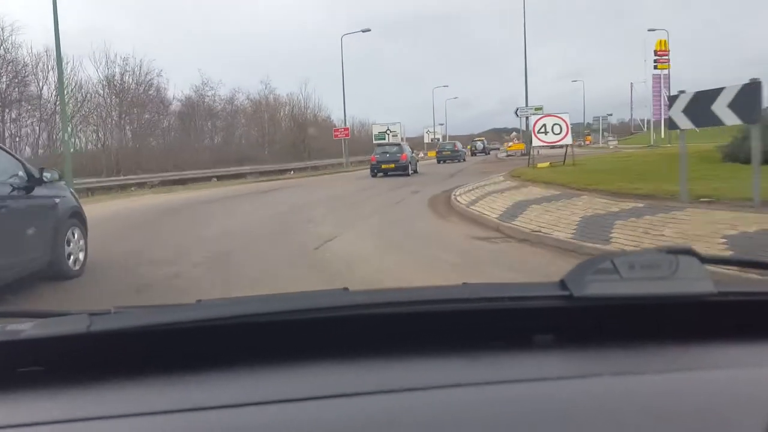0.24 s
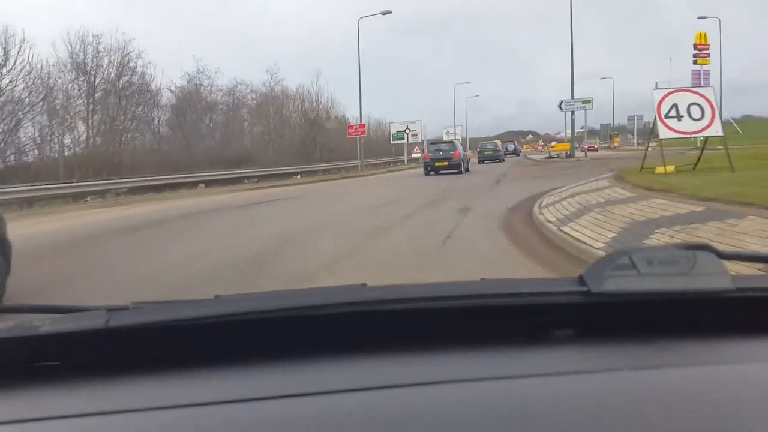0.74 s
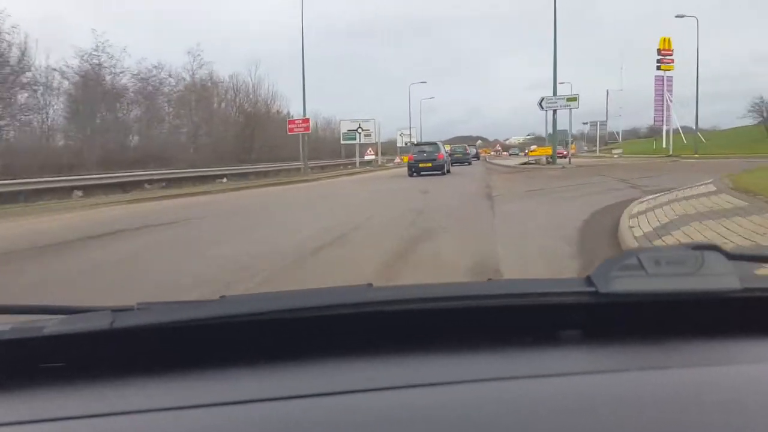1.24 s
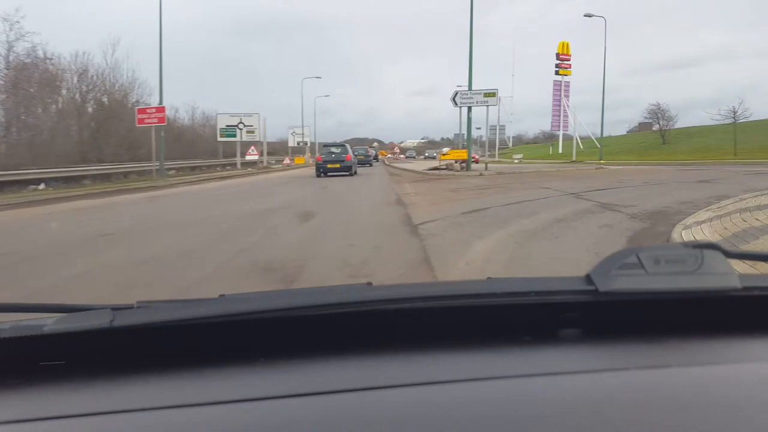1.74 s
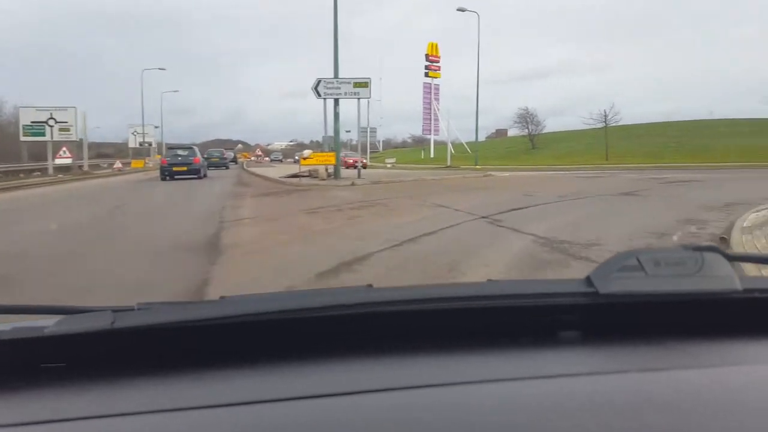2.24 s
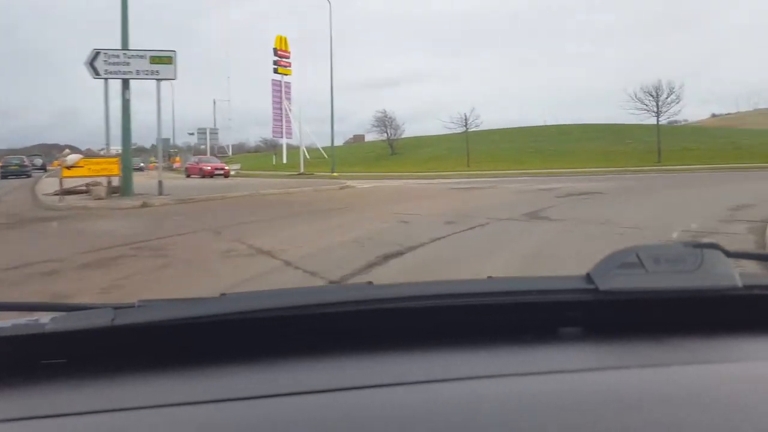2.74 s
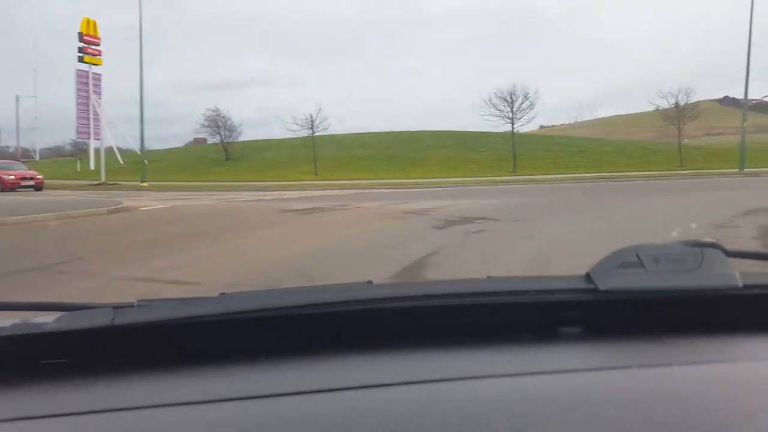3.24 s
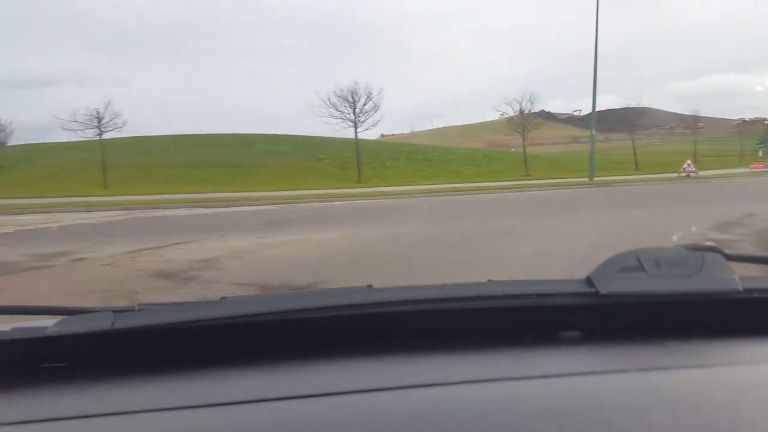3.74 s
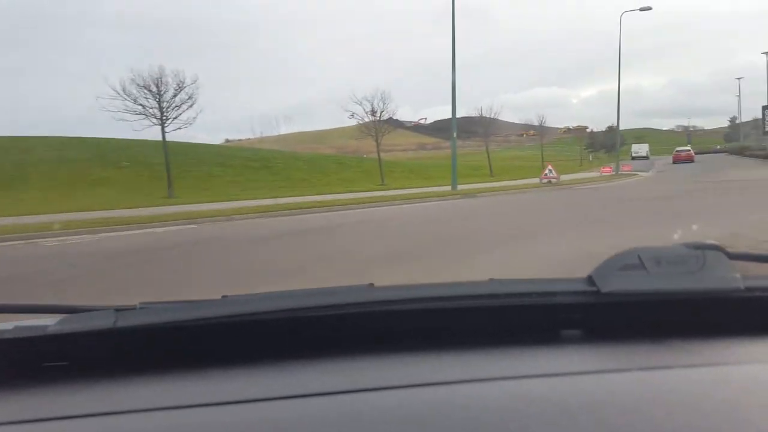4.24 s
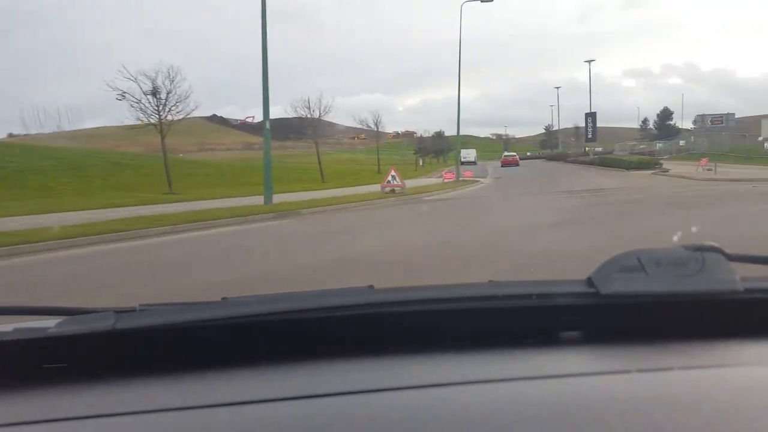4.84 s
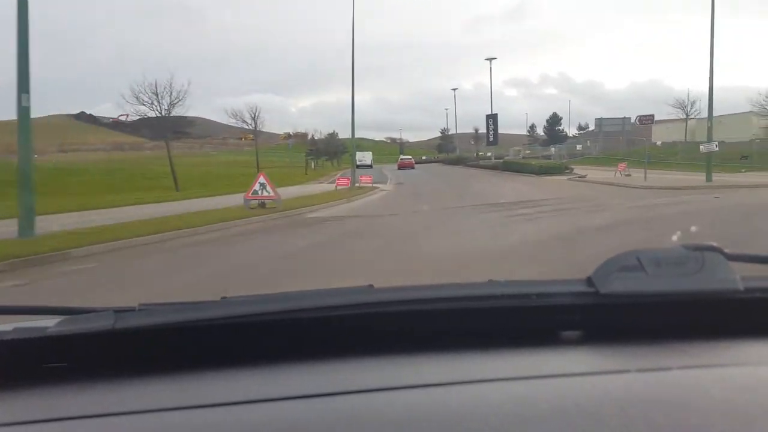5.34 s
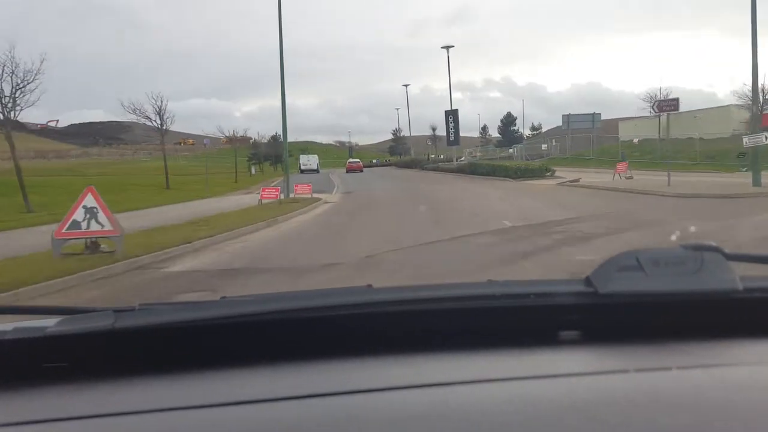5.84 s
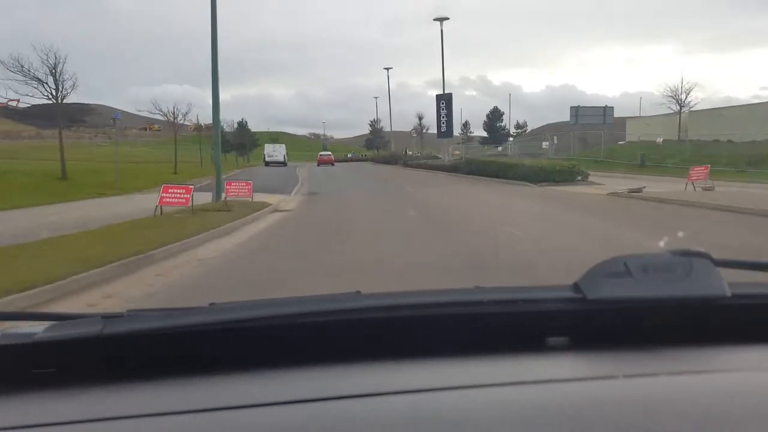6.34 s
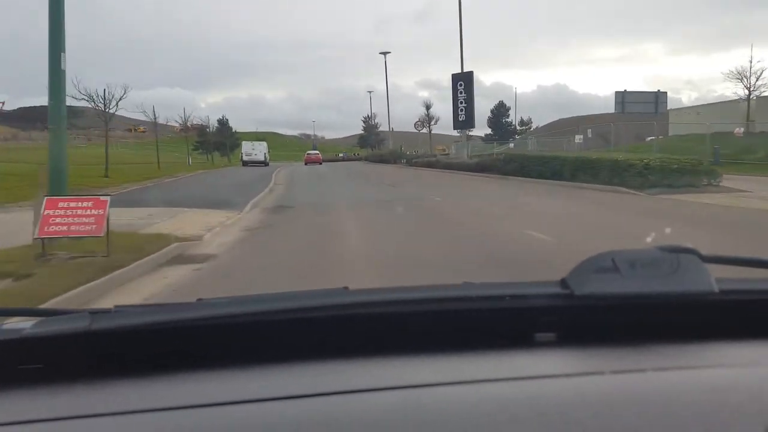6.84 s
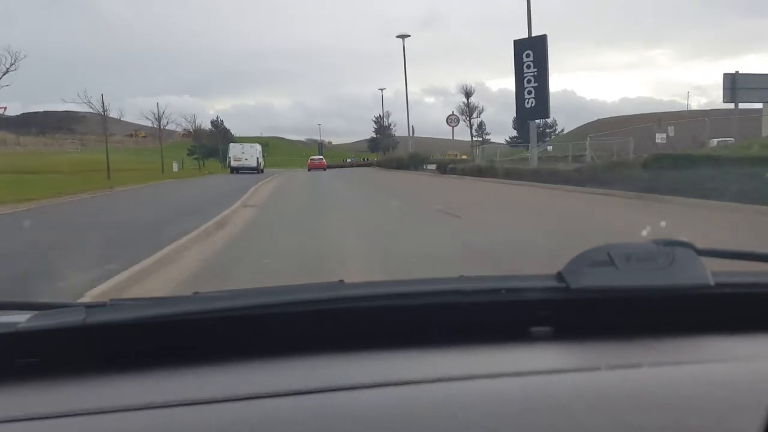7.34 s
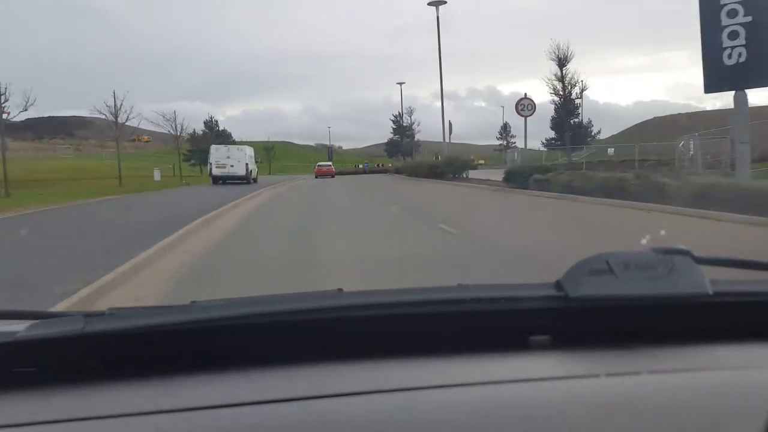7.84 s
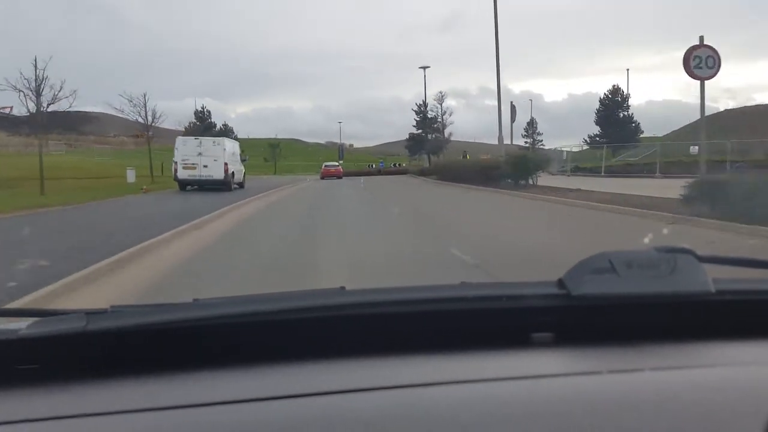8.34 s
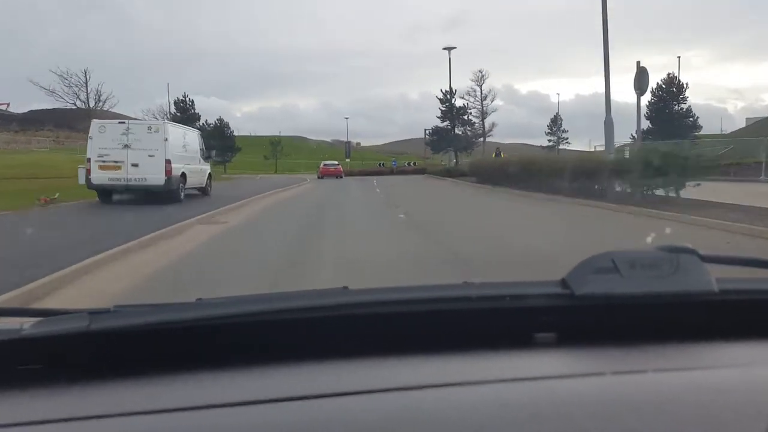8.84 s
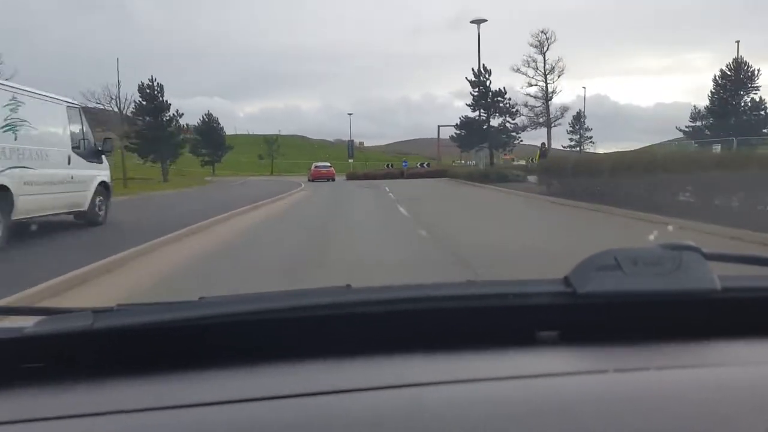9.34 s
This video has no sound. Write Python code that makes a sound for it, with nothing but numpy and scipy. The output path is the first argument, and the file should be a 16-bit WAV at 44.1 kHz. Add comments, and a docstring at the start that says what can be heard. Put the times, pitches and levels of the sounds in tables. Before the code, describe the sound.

Stereo sound inside a car cabin, about 9.6 seconds. A loud four-cylinder exhaust starts mid-pull, booming and raspy, rising until about 0.8 s. The throttle shuts; from 1.15 to 2.1 s the pipe gives a dozen uneven dull thuds with sharp cracks, over lumpy burbling and falling pitch. From 2.4 s a low drone wavers, then climbs steadily from about 4 s, growing louder and rougher. An indicator relay ticks softly on and off from 0.2 s to about 5.5 s. Loose trim buzzes from 5.5 to 7 s as the note turns hard and thin near 6.7 s, peaking in pitch around 7.4 s. The revs drop, with a brief burble, then faster pops and burbling from 8.1 to 9 s. At 9.1 s the boom returns abruptly, its pitch still sinking. Low tyre rumble, engine-bay rush, fizz and occasional small plastic clacks continue underneath.

```python
"""A four-cylinder car with a loud exhaust, heard from the cabin over about nine and a half seconds.
It pulls hard with a rasp, then the throttle shuts and the pipe pops and burbles for over a second.
It drones, climbs through the revs, pops and burbles again as they fall, and pulls once more at the end.
The note is a stack of tones tied to the firing rate; pops are struck resonances, burble is uneven firings.
The indicator ticks until about 5.5 s; trim fizzes and clacks over a low rumble and the engine-bay rush."""
import sys
import numpy as np
from scipy import signal
from scipy.fft import rfft, irfft, next_fast_len
from scipy.io import wavfile
from scipy.ndimage import uniform_filter1d, minimum_filter1d

SR = 44100
rng = np.random.default_rng(int(sys.argv[2]) if len(sys.argv) > 2 else 0)


def waveform_to_disk(signal):
    """Save audio, clipped to [-1, 1], as 16-bit WAV at the path in sys.argv[1]."""
    frames = np.transpose(np.atleast_2d(signal))
    scaled = np.clip(frames, -1, 1) * 32767
    samples = np.round(scaled).astype(np.int16)
    wavfile.write(sys.argv[1], SR, samples)


N = 422919
TIME = np.arange(N) / SR

# Stray combustion on a closed throttle, one list per stretch. Each row: time in seconds, relative level in dB.
CLOSED_THROTTLE = [
    [(.84, -41), (.89, -18), (1.06, -23.5), (1.15, -17.5), (1.55, -18), (1.9, -15.5), (2.05, -25.5),
     (2.16, -21.5), (2.28, -40.5)],
    [(7.48, -50.5), (7.55, -23), (7.62, -42.5)],
    [(8.1, -36), (8.15, -32), (8.3, -34.5), (8.55, -19), (8.8, -16), (8.98, -21.5), (9.07, -37)],
]
# Afterfire pops. Each row: time in seconds, relative level of the thud in dB, of the sharp crack in dB.
AFTERFIRE_POPS = [(1.167, -10.5, -27.5), (1.268, -3, -13), (1.313, -6.5, -14.5), (1.431, 1, -5.5),
                  (1.517, 5.5, 1), (1.567, -0.5, -5), (1.687, -0.5, -3.5), (1.814, 0.5, -1),
                  (1.93, -2.5, -5), (2.081, -2.5, -4), (8.127, -4.5, -6), (8.175, -3, -8),
                  (8.227, -14, -18.5), (8.357, 0.5, 1), (8.381, -1.5, -3), (8.428, -7.5, -16),
                  (8.534, 0.5, -6), (8.584, -7.5, -15), (8.668, -4, -15.5), (8.78, 0.5, -10),
                  (8.811, -8, -18), (8.842, -5.5, -17), (8.958, -6, -14.5)]
# Sharp clacks of plastic trim. Each row: time in seconds, relative level of the clack in dB,
# of the fizz after it in dB.
TRIM_CLACKS = [(.066, -39.5, -55), (.884, -31, -31.5), (1.143, -44, -60), (1.278, -54, -37),
               (3.19, -47, -43.5), (3.886, -56, -62), (7.554, -56, -39), (7.702, -39, -38),
               (8.574, -51, -37), (8.672, -54, -36)]
# Rush from the engine bay. Each row: time in seconds, relative level in dB.
BAY_LEVEL = [(0.0, -52.5), (0.29, -51.5), (1.52, -47.5), (3.2, -51), (3.44, -55), (4.22, -57), (5.13, -50),
             (5.61, -51.5), (6.84, -43), (7.48, -50.5), (8.04, -51), (8.44, -46), (9.11, -54),
             (9.59, -51.5)]


def from_db(db):
    """Turn decibels into a gain."""
    return 10 ** (np.asarray(db) / 20)


def rms_one(x):
    """Scale to unit power."""
    return x / np.sqrt(np.mean(x ** 2) + 1e-20)


def in_time(rows):
    """Draw each column of a timed table as a curve, sample by sample."""
    seconds, *columns = np.transpose(rows)
    return [np.interp(TIME, seconds, column) for column in columns]


def at_hz(table, hz, axis=1):
    """Read one column of a table at any pitch, on a log-frequency axis."""
    table = np.array(table)
    return np.interp(np.log(hz), np.log(table[:, 0]), table[:, axis])


def drift(rate):
    """Random wander of spread 1, with a new random target rate times a second."""
    knots = rng.standard_normal(8192)
    return rms_one(np.interp(TIME * rate, np.arange(len(knots)), knots))


def bout(start, end, attack_s, release_s):
    """Rise to 1 by the start, hold to the end, fall back to 0."""
    return np.interp(TIME, [start - attack_s, start, end, end + release_s], [0, 1, 1, 0])


def band(x, low_hz, high_hz, order=3):
    """Keep what lies between two frequencies."""
    sections = signal.butter(order, [low_hz, high_hz], "band", fs=SR, output="sos")
    return signal.sosfilt(sections, x + 1e-18)  # the tiny offset keeps the filter from slowing in silence


def resonate(x, modes):
    """Ring several resonances side by side, with alternating sign."""
    out = 0
    for k, (hz, width, db) in enumerate(modes):
        r = np.exp(-np.pi * width / SR)  # a wider resonance dies away sooner
        zeros = [(1 - r * r) / 2, 0, (r * r - 1) / 2]
        poles = [1, -2 * r * np.cos(2 * np.pi * hz / SR), r * r]
        out = out + (-1) ** k * from_db(db) * signal.lfilter(zeros, poles, x + 1e-18)
    return out


def strikes(events):
    """Place a one-sample click for each row of time in seconds and level in dB."""
    seconds, db = np.transpose(events)
    clicks = np.zeros(N)
    clicks[(seconds * SR).astype(int)] = from_db(db)
    return clicks


def fade(clicks, t60):
    """Let each click jump up and die away by 60 dB in t60 seconds."""
    return signal.lfilter([1], [1, -np.exp(-np.log(1000) / (t60 * SR))], clicks + 1e-18)


def clicks_on(events, modes, level_db, t60):
    """Click a small part: fading noise, different in each ear, rings its resonances."""
    scatter = fade(strikes(events), t60) * rng.standard_normal((2, N))
    unit = np.std(resonate(rng.standard_normal(SR), modes))  # how loud plain noise comes out
    return from_db(level_db) * resonate(scatter, modes) / unit


def noise(spectrum, low_hz, high_hz, lag_s=0.00041):
    """Coloured stereo noise, of unit power between two frequencies; it reaches the left ear first."""
    # Width of the noise. Each row: frequency in Hz, side minus middle in dB.
    stereo_width = [(40, -11), (120, -14.5), (400, -8), (700, -8), (1150, -4), (2300, -4.5), (4400, 0.5),
                    (15000, -2)]
    size = next_fast_len(N, real=True)
    hz = np.maximum(np.arange(size // 2 + 1) * SR / size, 1)
    mid, side = rfft(rng.standard_normal((2, size))) * from_db(at_hz(spectrum, hz))
    side = side * from_db(at_hz(stereo_width, hz))
    delay = np.exp(-2j * np.pi * hz * lag_s)
    pair = np.array([mid + side, (mid - side) * delay])
    inside = (hz > low_hz) * (hz < high_hz)
    power = np.mean(abs(pair.mean(axis=0)) ** 2 * inside) / size
    return irfft(pair, size)[:, :N] / np.sqrt(power)


def cabin(hz):
    """Standing waves make each pitch differ in level and phase (complex gains) at left and right."""
    # Each row: frequency in Hz, left minus right in dB, lead of the left in radians.
    standing_waves = [(60, 1.6, 0), (117, 3, .3), (135, 2.4, .1), (155, 0, 0), (180, 0, -.25),
                      (200, 2.5, -1), (212, 1, -1.2), (225, 9, -.4), (270, 7.5, -.7), (305, 1.5, -.15),
                      (355, 0, 0), (410, -2, .6), (455, -7, 1.4), (530, 2, 1.1), (700, 0, 1.7),
                      (1050, 0, 2.5), (1300, 4.5, 3), (1800, 0, 4.5), (3000, 0, 7.4)]
    half_level = from_db(at_hz(standing_waves, hz) / 2)
    half = half_level * np.exp(.5j * at_hz(standing_waves, hz, axis=2))
    # keep the sum of both sides even, unless they nearly cancel
    return np.array([half, 1 / half]) / np.maximum(abs(half + 1 / half) / 2, .5)


def through_cabin(x):
    """Send a mono sound through the standing waves to left and right."""
    size = next_fast_len(N + SR // 10, real=True)
    hz = np.maximum(np.arange(size // 2 + 1) * SR / size, 1)
    return irfft(rfft(x, size) * cabin(hz), size)[:, :N]


def engine_speed():
    """The firing rate in Hz: how often a cylinder fires as the revs rise and fall."""
    # Each row: time in seconds, firings per second.
    speed = [(0.0, 113.4), (0.33, 128.4), (0.77, 151.2), (0.93, 144), (1.16, 138.5), (1.6, 130), (2.2, 119),
             (2.43, 119.4), (2.7, 113), (3.0, 118.3), (3.2, 113), (3.45, 118.6), (3.73, 115), (4.06, 123.7),
             (4.33, 125.4), (4.98, 140), (5.39, 152.4), (6.1, 182), (6.54, 199.8), (6.72, 205.6),
             (7.04, 223), (7.42, 233.6), (7.63, 210.6), (8.13, 211.2), (8.73, 179.4), (9.05, 160),
             (9.17, 161), (9.59, 142)]
    return in_time(speed)[0]


def hard_pull(attack_s=0.09, release_s=0.13):
    """How far (0 to 1) the boom thins out and the note turns hard and raspy in a pull."""
    # Each row: start in seconds, end in seconds.
    stretches = [(0, 0.19), (6.6, 6.88)]
    return sum(bout(start, end, attack_s, release_s) for start, end in stretches)


def misfires(span_s=0.025):
    """A swell from 0 to 1 and back around each pop, and the slip of phase, in firings, that pops leave."""
    slips = rng.uniform(-.5, .5, len(AFTERFIRE_POPS))
    swell, slip = np.zeros(N), np.zeros(N)
    for (s, *_), turn in zip(AFTERFIRE_POPS, slips):
        swell = np.maximum(swell, np.interp(TIME, [s - span_s, s, s + span_s], [0, 1, 0]))
        slip += np.interp(TIME, [s - span_s / 2, s + span_s / 2], [0, turn])
    return swell, slip


def partial(multiple, firing_hz, turns, level_db, spectrum, size=32):
    """One engine order, a tone at a multiple of the firing rate, coloured by pipe and cabin at its pitch."""
    hz = multiple * firing_hz[::size]
    gain = cabin(hz) * from_db(level_db[::size] + at_hz(spectrum, hz)) * np.sqrt(2)
    gain = np.repeat(gain.astype(np.complex64), size, axis=1)[:, :N]
    # the lowest orders stay in step, so unequal cylinders throb once a cycle; the cabin scatters the rest
    scatter = min(multiple / 3, 1) ** 2 * rng.uniform(-.5, .5)
    angle = (2 * np.pi * ((multiple * turns + scatter) % 1)).astype(np.float32)
    return gain.real * np.cos(angle) - gain.imag * np.sin(angle)


def exhaust_note(firing_hz, turns, hard):
    """Booming low orders, a rasp of high ones under load, and orders in between from unequal cylinders."""
    # Strength of the low orders as the note swells and sinks.
    # Each row: time in seconds, strength in dB.
    low_strength = [(0.0, 5.5), (0.8, 8), (0.93, -5.5), (1.07, -6.5), (1.17, -1.4), (1.6, -1.9),
                    (2.19, -12.5), (2.4, 0.5), (2.8, 2.5), (4.2, 4.5), (5.3, 7.5), (7.05, -2), (7.42, -7),
                    (7.6, -9), (8.05, -4.9), (8.7, 1.9), (8.96, -0.5), (9.04, -10.2), (9.13, 5),
                    (9.59, 0.5)]
    # Load brings out the upper orders and the throb of unequal cylinders.
    # Each row: time in seconds, relative rasp in dB, relative imbalance in dB.
    load = [(0, -45, -37.5), (.8, -43, -32), (.92, -53, -43.5), (2.2, -66, -55), (2.4, -54, -46.5),
            (4.3, -53.5, -41), (4.7, -44.5, -35.5), (6, -43.5, -30.5), (6.45, -39, -26.5), (6.8, -35, -25),
            (7.05, -33.5, -28), (7.4, -40.5, -33.5), (7.6, -47, -35.5), (8.05, -46, -38.5), (8.6, -43, -28),
            (9.05, -49, -37.5), (9.59, -49.5, -38)]
    # Pipe and cabin favour some pitches, so low orders swell and fade as the revs sweep them along.
    # Each row: frequency in Hz, level in dB.
    boom_response = [(116, -23), (128, -14.5), (152, -13.5), (190, -10.5), (208, -15.5), (226, -5),
                     (250, -10), (279, -30), (300, -19.5), (365, -11.5), (405, -11), (435, -6.5),
                     (490, -16), (600, -20.5), (655, -16), (692, -7), (760, -14.5), (900, -5)]
    # The 1st to 4th multiple of the firing rate.
    # Each row: relative level in dB, dB per dB of strength, change in a hard stretch in dB.
    low_orders = [(0, 0.72, -7.5), (-8, 1.3743, -7), (-20, 1.27, 6), (-29, 1.57, 5.5)]
    # Colour of the high orders. Each row: frequency in Hz, relative level in dB.
    rasp_colour = [(450, -2), (560, 1.5), (690, 3.5), (800, -2.5), (900, -2.5), (1150, -11), (1500, -20),
                   (2100, -21), (3000, -31.5)]
    # Colour of the in-between orders. Each row: frequency in Hz, relative level in dB.
    uneven_colour = [(30, -12), (70, -14.5), (100, -5), (135, -0.5), (190, -13.5), (255, -1), (310, -2),
                     (370, -3.5), (450, -6.5), (550, -16.5), (800, -21), (1200, -30), (2200, -44.5)]
    waver_db, uneven_waver_db, rasp_waver_db = 0.52, 3.5, 3.5
    half_order_db = -5.5

    strength_db, = in_time(low_strength)
    rasp_db, uneven_db = in_time(load)
    # with the throttle shut combustion is erratic: the low orders lurch in strength and timing
    shut = 0
    for rows in CLOSED_THROTTLE:
        corners = [rows[0][0], rows[1][0], rows[-2][0], rows[-1][0]]
        shut = shut + np.interp(TIME, corners, [0, 1, 1, 0])
    lurch = turns + .07 * shut * drift(22)
    out = 0
    for k, (db, per_strength, hard_db) in enumerate(low_orders, 1):
        erratic_db = 1.5 * min(k, 2) * shut * drift(25)
        level_db = db + per_strength * strength_db + hard_db * hard + waver_db * k * drift(45) + erratic_db
        out = out + partial(k, firing_hz, lurch, level_db, boom_response)
    for k in range(len(low_orders) + 1, 15):
        out += partial(k, firing_hz, turns, rasp_db + rasp_waver_db * drift(25), rasp_colour)
    for k in np.arange(2, 38) / 4:  # quarter steps, skipping the whole multiples
        if k % 1:
            level_db = uneven_db + uneven_waver_db * drift(14) + half_order_db * (k % .5 == 0)
            out += partial(k, firing_hz, turns, level_db, uneven_colour)
    return out


def burble(turns, low_hz=90, soft_hz=450, lumpy_db=5.5):
    """With the throttle shut each firing has a chance strength and sets the pipe booming."""
    # Resonances of the pipe. Each row: frequency in Hz, width in Hz, relative level in dB.
    pipe = [(128, 29, -6.5), (199, 30, 5), (204, 67, -4), (361, 39, -8.5), (407, 92, -26)]
    charge = rng.uniform(-1, 1, N)
    fires = np.diff(np.floor(turns), prepend=0)  # a click whenever the phase passes a whole firing
    firings = fires * charge * from_db(lumpy_db * drift(30))
    level = 0
    for rows in CLOSED_THROTTLE:
        level = level + from_db(np.interp(TIME, *np.transpose(rows), left=-200, right=-200))
    return level * rms_one(band(resonate(firings, pipe), low_hz, soft_hz))


def afterfire(thud_db=39.0, crack_db=30.5, boom_db=47.5, crack_s=.0065, echo_s=.014, echo_db=-9.5):
    """Fuel lights in the pipe: a dull thud, a sharper crack just behind it, then the pipe booms on."""
    # Resonances of thud, crack and boom. Each row: frequency in Hz, width in Hz, relative level in dB.
    thud_modes = [(382, 100, -1), (296, 130, -7)]
    crack_modes = [(548, 81, 1), (601, 70, -1), (670, 110, -8)]
    boom_modes = [(197.8, 16, 4), (154, 86, -4.5)]
    thuds = strikes([(s, db) for s, db, _ in AFTERFIRE_POPS])
    cracks = strikes([(s + crack_s, db) for s, _, db in AFTERFIRE_POPS])
    bang = from_db(thud_db) * band(resonate(thuds, thud_modes), low_hz=149, high_hz=520, order=4)
    bang += from_db(crack_db) * band(resonate(cracks, crack_modes), low_hz=300, high_hz=824, order=5)
    echo = from_db(echo_db) * np.interp(TIME - echo_s, TIME, bang)
    boom = from_db(boom_db) * band(resonate(thuds, boom_modes), low_hz=148, high_hz=269)
    return bang + echo + boom


def trim_fizz(turns, hard, throb=0.092, flutter_db=1.0, pan_db=1.0):
    """Loose trim chatters in step with the crankshaft, buzzes in bouts and sizzles after each jolt."""
    # Bouts of buzzing. Each row: start in seconds, end in seconds, relative level in dB,
    # attack in seconds, release in seconds.
    buzzes = [(0.026, 0.152, -53.5, 0.12, 0.58), (1.32, 1.346, -45.5, .1, 0.071),
              (5.68, 6.95, -46.5, 0.51, 0.89), (7.4, 7.44, -48.5, 0.63, 0.16),
              (8.237, 8.468, -42, 0.58, .2), (8.92, 8.984, -53.5, .5, .08)]
    # Colour of the fizz. Each row: frequency in Hz, relative level in dB.
    fizz_colour = [(1000, -15), (2400, -0.5), (3200, -11), (4400, -8), (6000, -10), (7000, -8.5),
                   (8300, -2), (10500, -3), (12300, 1), (14000, -2), (16000, -6)]
    swell_db, hard_buzz_db = 37, 3.5  # rise over the attack; extra buzz in a hard stretch
    chatter_db, chatter_per_rush = -64.5, 1.6  # relative dB at the mean rush; dB per dB of rush
    # each pop jolts the trim a moment later: delay, relative dB for a 0 dB crack, dB per dB of crack
    jolt_delay_s, pop_jolt_db, jolt_per_crack = 0.01, -28, 0.95
    shaken_db, jolt_t60 = -6.5, 0.13  # level of all jolts, and seconds to fall by 60 dB

    # between bouts the chatter is faint, rising and falling with the engine-bay rush
    bay_db, = in_time(BAY_LEVEL)
    faint = from_db(chatter_db + chatter_per_rush * (bay_db - bay_db.mean()))
    buzz = 0
    for start, end, db, attack_s, release_s in buzzes:
        swell = bout(start, end, attack_s, release_s)
        buzz = buzz + from_db(db + swell_db * (swell - 1)) * (swell > 0)
    chatter = np.hypot(faint, buzz * from_db(hard_buzz_db * hard))
    # the crankshaft turns once for every two firings
    chatter = chatter * from_db(flutter_db * drift(60)) * (1 + throb * np.cos(np.pi * turns))

    jolts = [(s + jolt_delay_s, pop_jolt_db + jolt_per_crack * db) for s, _, db in AFTERFIRE_POPS]
    jolts += [(s, db) for s, _, db in TRIM_CLACKS]
    shaken = from_db(shaken_db) * uniform_filter1d(fade(strikes(jolts), jolt_t60), 176)
    fizz = noise(fizz_colour, 6000, 15000)
    return np.hypot(chatter, shaken) * fizz * from_db([[pan_db], [-pan_db]])


def plastic_clacks():
    """Plastic trim knocks sharply and rings for a moment."""
    # Resonances of the plastic. Each row: frequency in Hz, width in Hz, relative level in dB.
    plastic = [(2920, 590, -1.5), (3960, 280, 1.5), (5050, 230, -1.5), (6600, 500, 1)]
    return clicks_on([(s, db) for s, db, _ in TRIM_CLACKS], plastic, level_db=-3.0, t60=0.08)


def indicator(start_s=.231, end_s=5.6, period_s=.753, lamp_on_s=.415, close_db=-34.5, open_db=-35):
    """The relay ticks as the lamp comes on and again as it goes off."""
    # Resonances of the relay. Each row: frequency in Hz, width in Hz, relative level in dB.
    relay = [(2280, 150, 5.5), (2460, 580, -4), (3810, 550, -3.5), (4100, 500, -6.5)]
    closes = np.arange(start_s, end_s, period_s)
    ticks = [(s, close_db) for s in closes]
    ticks += [(s + lamp_on_s, open_db) for s in closes[:-1]]  # the last close has no opening tick
    return clicks_on(ticks, relay, level_db=-3.5, t60=0.084)


def rumble_and_bay(turns, rumble_db=0.5, rush_db=-0.64, throb=0.12, lumpy_db=0.5):
    """Low rumble of tyres and exhaust, stronger while the pipe burbles; bay rush pulsing with each firing."""
    # Low rumble of tyres and exhaust. Each row: time in seconds, relative level in dB.
    rumble_level = [(0.0, -42), (0.85, -30), (0.99, -26.5), (1.15, -35), (1.2, -24), (2.4, -38),
                    (5.88, -34.5), (5.98, -37), (6.28, -31.5), (6.92, -47.5), (7.42, -35), (7.66, -54.5),
                    (8.65, -41), (8.84, -28), (9.24, -42.5), (9.59, -30.5)]
    # Colour of the rumble, then of the rush. Each row: frequency in Hz, relative level in dB.
    rumble_colour = [(15, -9.5), (28, -5.5), (45, 3), (62, -0.5), (80, 1.5), (130, 5), (250, -1.5),
                     (400, -25), (600, -27.5), (1000, -39), (3000, -68.5)]
    rush_colour = [(80, -10), (300, 11.5), (480, 16), (650, 6.5), (900, 10.5), (1150, 4.5), (1500, 1.5),
                   (2100, -1), (2600, -5.5), (3200, -11.5), (4000, -15), (5500, -21), (9000, -24.5),
                   (16000, -34)]
    low_db, = in_time(rumble_level)
    bay_db, = in_time(BAY_LEVEL)
    rumble = noise(rumble_colour, 30, 85) * from_db(low_db + rumble_db + lumpy_db * drift(9))
    pulse = 1 + throb * np.cos(2 * np.pi * turns)
    bay = noise(rush_colour, 1300, 3000) * from_db(bay_db + rush_db) * pulse
    return rumble + bay


def scene(jitter=.009, misfire_db=-1.0):
    """Run the engine sounds off one firing phase; the steady note stumbles at each pop."""
    firing_hz = engine_speed()
    hard = hard_pull()
    stumble, slip = misfires()
    turns = np.cumsum(firing_hz) / SR + jitter * drift(60)  # phase counted in firings
    note = exhaust_note(firing_hz, turns + slip, hard) * from_db(misfire_db * stumble)
    exhaust = note + through_cabin(burble(turns) + afterfire())
    loose_trim = trim_fizz(turns, hard) + plastic_clacks()
    return exhaust + loose_trim + indicator() + rumble_and_bay(turns)


def record(dry, ceiling=0.84, size=220, cutoff_hz=15700):
    """A limiter ducks the highest peaks, then a steep filter cuts the top of the treble."""
    room = np.minimum(1, ceiling / (abs(dry).max(axis=0) + 1e-9))
    limited = dry * uniform_filter1d(minimum_filter1d(room, 2 * size), size)
    return signal.sosfilt(signal.ellip(12, .1, 80, cutoff_hz, fs=SR, output="sos"), limited)


dry = scene()
out = record(dry)
waveform_to_disk(out)
```